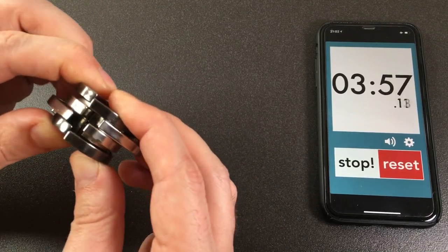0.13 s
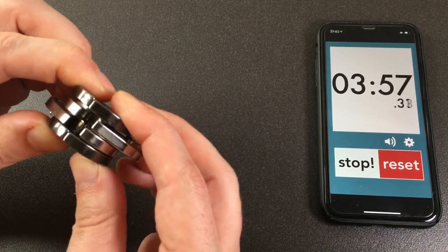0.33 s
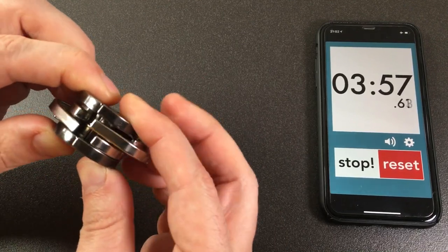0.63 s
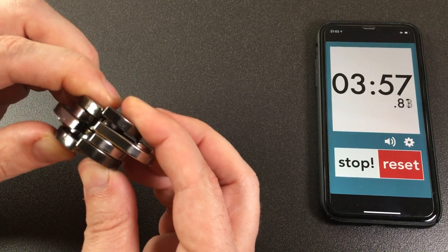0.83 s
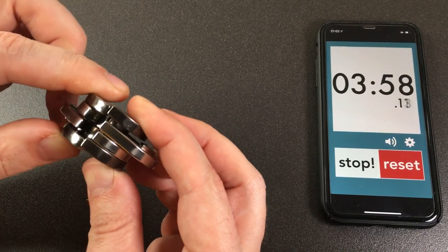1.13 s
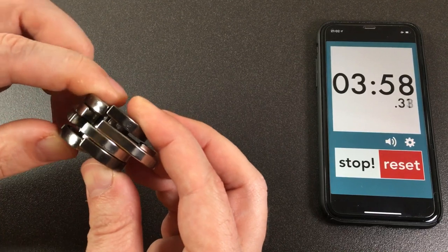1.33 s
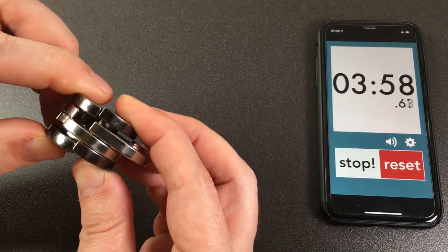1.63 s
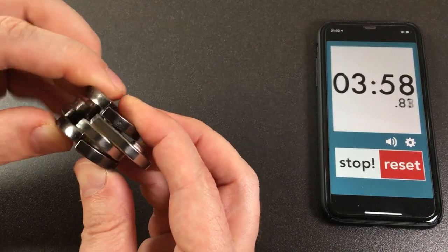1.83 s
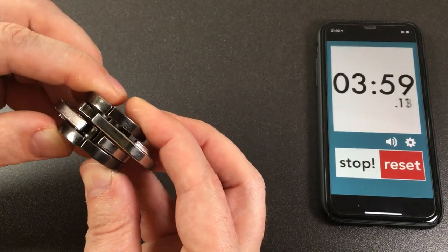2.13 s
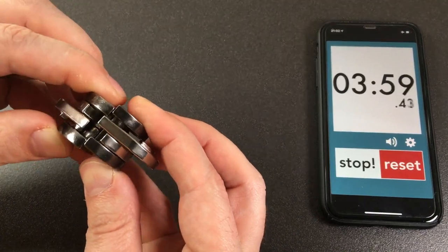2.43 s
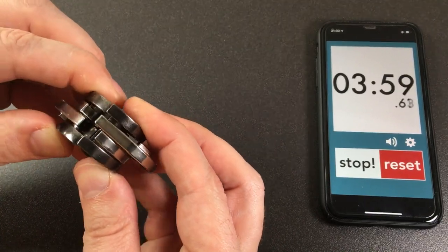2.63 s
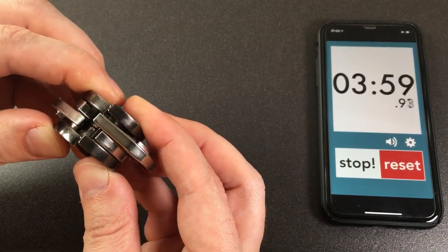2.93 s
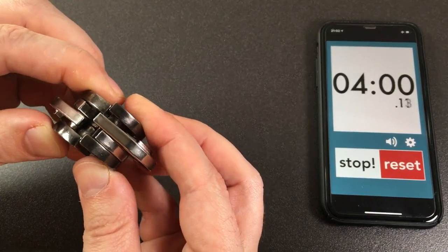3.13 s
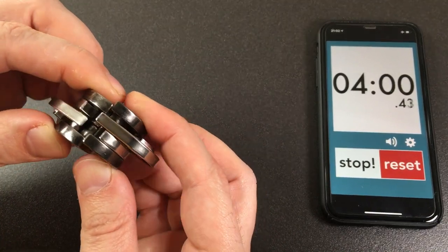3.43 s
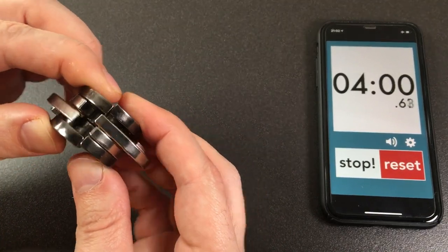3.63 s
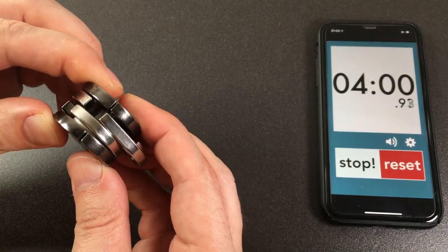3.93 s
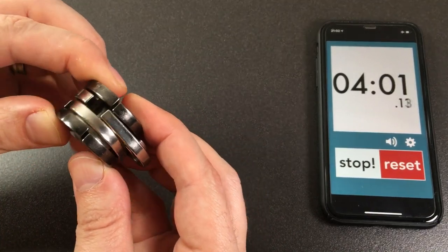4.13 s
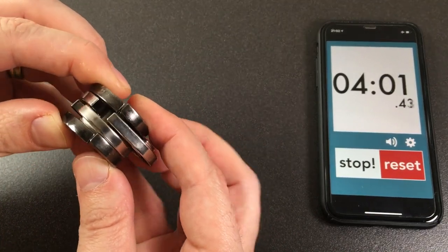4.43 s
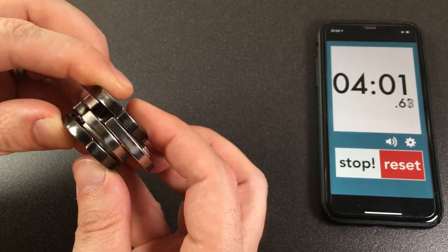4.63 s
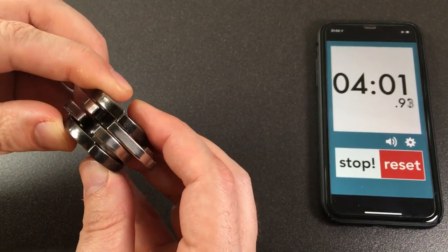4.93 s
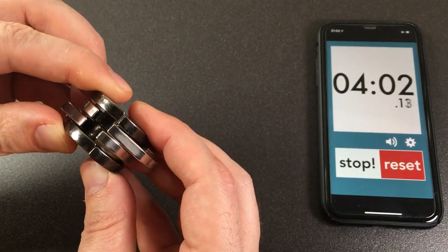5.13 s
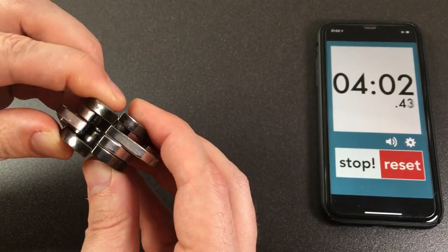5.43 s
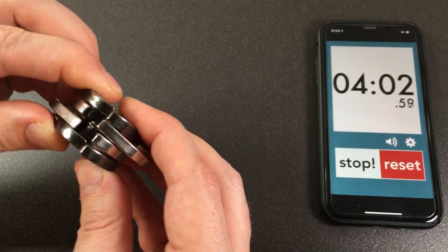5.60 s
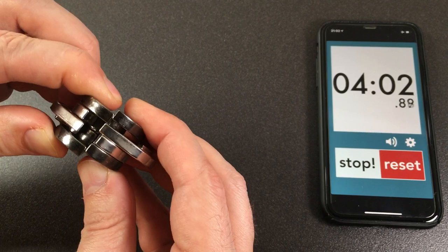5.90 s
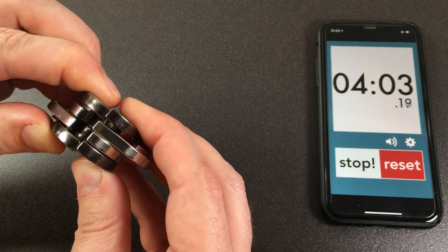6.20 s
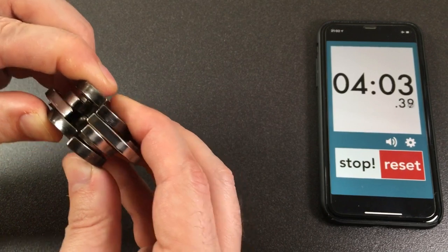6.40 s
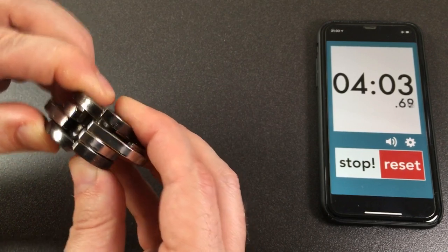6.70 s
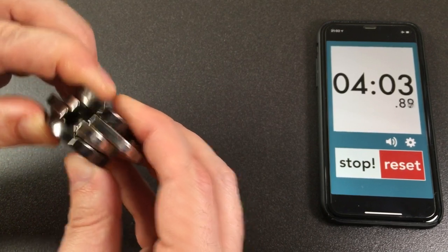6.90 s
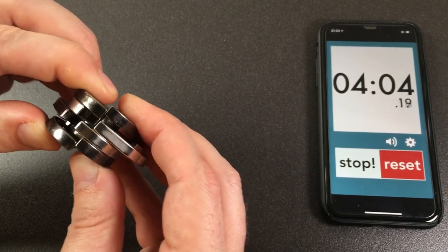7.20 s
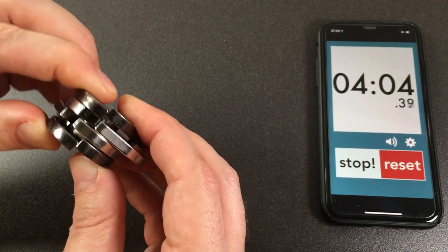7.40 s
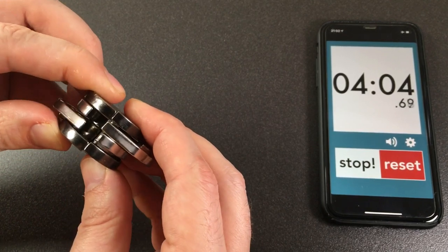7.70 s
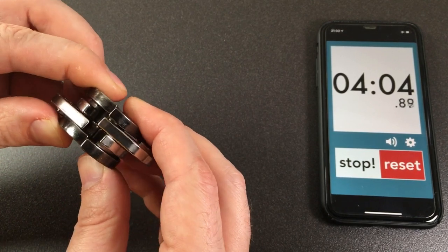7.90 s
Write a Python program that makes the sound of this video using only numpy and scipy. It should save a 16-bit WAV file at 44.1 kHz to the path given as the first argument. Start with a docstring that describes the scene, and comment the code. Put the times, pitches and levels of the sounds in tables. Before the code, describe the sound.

A close, dry take in a small quiet room: interlocked steel puzzle pieces worked in the fingers over a desk. A low desk rumble fades at once, leaving soft room tone and faint high ticks. Until about 1.5 s the clicks are sparse and light, with soft desk taps near 1.1 s. From 1.6 to 2 s a tighter, brighter cluster chatters, followed by uneven small clinks. Sharp snaps stand out around 3.7-3.85 s, then scattered clicks with strong ones near 4.2 and 4.7 s. It thins around 5 s, picks up from 5.3 s, with a hard clack at 5.8 s. Between 6.05 and 7.25 s loud knocks come every tenth of a second or so, with fine rattle, dull desk bumps and low booming. After 7.3 s it drops to small quick ticks until 8 s. Rings are short and finger-damped; sleeve friction is barely audible.

```python
"""Faint, high steel ticks open over a fading desk boom and quiet room tone; then knocks crowd in and harden.
Interlocked steel puzzle pieces are jiggled in the hands above a desk, close to a microphone. Each knock
is a chatter of random contacts ringing finger-damped modes, with a fine rattle of grazing pieces around it.
Noise through the desk modes makes soft bumps and sleeve hiss; noise in three low bands makes the boom.
A small room answers with sparse decaying echoes, and shaped steady noise is the room tone."""
import sys
import numpy as np
from scipy import signal
from scipy.fft import rfft, irfft
from scipy.io import wavfile
from scipy.ndimage import uniform_filter1d

SR = 44100
rng = np.random.default_rng(int(sys.argv[2]) if len(sys.argv) > 2 else 0)


def wav_record(signal):
    """Record a signal, one row per channel, as 16-bit PCM in the file named by sys.argv[1]."""
    frames = np.transpose(np.atleast_2d(signal))
    bounded = np.clip(frames, -1, 1)
    # unit amplitude maps onto the largest positive 16-bit level
    quanta = np.round(bounded * 32767).astype(np.int16)
    wavfile.write(sys.argv[1], SR, quanta)


N = 355049


def gain_of(db):
    """Decibels to amplitude."""
    return 10 ** (np.asarray(db) / 20)


def evened(x):
    """Scales to rms 1."""
    return x / np.sqrt(np.mean(x ** 2) + 1e-20)


def read(points, hz):
    """Reads a table on a log-frequency axis."""
    f, value = np.transpose(points)
    return np.interp(np.log(hz + 1), np.log(f + 1), value)


def follow(points):
    """Reads a table over time, one value per sample."""
    return np.interp(np.arange(N) / SR, *np.transpose(points))


def add(mix, s, sound):
    """Mixes a sound in at time s."""
    part = mix[round(s * SR):][:len(sound)]
    part += sound[:len(part)]


# steel knocks: [t/s, peak level/dB, favoured mode f/Hz, favoured mode gain/dB,
#                clack level/dB, upper ring level/dB, chatter length/s]; both levels relative to the main ring
KNOCKS = [(0.114, -53, 6200, 13, -4, -24, 0.005), (0.205, -48.5, 5000, 11, -12, -16, 0.0029),
          (0.247, -40.5, 6300, 3, -17, -18, 0.002), (0.303, -50.0, 6550, 6, -13, -24, 0.0027),
          (0.326, -39.5, 6660, 0, -20, -23, 0.0029), (0.349, -32.5, 5700, 10, -11.5, -11, 0.0021),
          (0.483, -42.5, 5700, 3, -22, -13, 0.0024), (0.608, -49, 4960, 12, -32, -24, 0.0017),
          (0.633, -53.5, 6700, 10, -14, -23, 0.003), (0.755, -31.5, 6300, 1, -25, -15.5, 0.0022),
          (0.84, -39, 4880, 9, -18, -17, 0.0017), (0.86, -33.5, 9100, 7, -19.5, -17, 0.0025),
          (0.871, -34, 9700, 0, -18, -5, 0.002), (0.997, -55.0, 11100, 7, -6, -10, 0.0026),
          (1.028, -53, 7100, 7, -16, -14, 0.0091), (1.049, -44.5, 5050, 19, -21, -18, 0.0057),
          (1.07, -49.0, 5730, 12, -14, -22, 0.003), (1.276, -32.5, 6900, 23, -21, -10.5, 0.0026),
          (1.304, -44.5, 9760, 7, -12, -4, 0.0065), (1.364, -48.5, 7610, 15, -16, -10, 0.0027),
          (1.381, -52.0, 7560, 7, -8, -15, 0.0077), (1.442, -55.0, 6960, 4, -14, -11, 0.0033),
          (1.551, -44, 2840, 10, -9, -24, 0.0026), (1.568, -48, 3450, 25, -13, -31, 0.0025),
          (1.612, -45, 6020, 10, -12, -31, 0.003), (1.627, -24.0, 9460, 13, -11.5, -13, 0.0036),
          (1.637, -23.5, 12200, 3, -30, -2, 0.0028), (1.661, -32.0, 6800, 1, -23, -21, 0.0036),
          (1.702, -33.0, 7000, 9, -24, -12, 0.0027), (1.751, -46, 6200, 7, -18, -26, 0.0028),
          (1.808, -30.5, 6700, 6, -26, -14, 0.0018), (1.818, -24.5, 6530, 9, -26, -9, 0.0016),
          (1.83, -27.5, 6700, 16, -17, -2, 0.0018), (1.867, -30.5, 8430, 2, -10, -7, 0.0057),
          (1.879, -17, 6680, 15, -18.5, -5.5, 0.0042), (1.902, -28.5, 6640, 10, -23, -19, 0.006),
          (1.918, -24, 6640, 4, -24, -13, 0.0035), (1.983, -35, 6470, 5, -19, -16, 0.0046),
          (2.005, -42.5, 6060, 9, -18, -16, 0.006), (2.033, -29.5, 9540, 18, -15, -17, 0.0043),
          (2.206, -37.5, 6160, 12, -12, -13, 0.0018), (2.232, -34.5, 6730, 6, -14, -9, 0.0033),
          (2.286, -25.0, 6120, 24, -13.5, -6.5, 0.0039), (2.328, -40.5, 8660, 13, -4, -9, 0.0035),
          (2.337, -33.5, 6570, 14, -21, -5, 0.003), (2.367, -43, 8700, 13, -29, -10, 0.0024),
          (2.385, -41.0, 6500, 7, -17, -11, 0.0044), (2.408, -41, 6200, 10, -14, -11, 0.0041),
          (2.493, -45, 4010, 16, -1, -17, 0.0017), (2.5305, -28, 7610, 32, -11, -8, 0.0019),
          (2.576, -46, 7240, 9, -8, -20, 0.0057), (2.632, -28.5, 9380, 11, -34, -7, 0.0018),
          (2.648, -41, 6100, 7, -8, -7, 0.0018), (2.669, -38, 2820, 18, -14, -7, 0.0018),
          (2.69, -30, 8660, 13, -14, -18, 0.002), (2.716, -41.0, 4340, 9, -6, -31, 0.0023),
          (2.726, -21.5, 5900, 3, -23, -15, 0.0024), (2.73, -24, 5920, 14, -19, -10, 0.004),
          (2.849, -29, 6640, 1, -15, -3, 0.0024), (2.866, -33.5, 6050, 3, -33, -10, 0.0024),
          (2.936, -43, 7160, 7, -12, -25, 0.003), (2.945, -29, 6300, 7, -35, -21, 0.0023),
          (2.95, -27, 11260, 7, -19, -6, 0.0026), (3.02, -47, 9540, 17, -16, -11, 0.0085),
          (3.057, -41.5, 4840, 14, -19, -34, 0.0028), (3.08, -46.0, 4850, 10, -15, -15, 0.0026),
          (3.199, -34.5, 5860, 11, -15, -16, 0.0025), (3.267, -45.5, 6700, 7, -19, -39, 0.0025),
          (3.3224, -35, 4800, 4, -12, -6, 0.0029), (3.378, -44.5, 6040, 2, -8, -17, 0.0042),
          (3.418, -34.0, 6880, 20, -20, -9, 0.0025), (3.4815, -46.0, 8700, 10, -13, -13, 0.0021),
          (3.572, -34.5, 6550, 6, -29, -14, 0.0093), (3.602, -33, 8200, 16, -21, -15, 0.0019),
          (3.688, -50, 9150, 7, -22, -18, 0.004), (3.708, -46.5, 10800, 1, -8, -4, 0.0027),
          (3.717, -17, 13050, 6, -32, -41, 0.0058), (3.721, -18, 4770, 5, -37, -12, 0.0048),
          (3.725, -15.0, 12280, 16, -15, 5, 0.0048), (3.792, -21.5, 8500, 16, -37, -12, 0.002),
          (3.833, -30.5, 2820, 7.5, -9, -13, 0.0081), (3.8437, -9.5, 12120, 1.5, -23.5, -9, 0.0044),
          (3.934, -37.5, 8440, 2, -9, 0, 0.003), (3.971, -20.5, 6630, 10.5, -17.5, -20, 0.0017),
          (3.981, -28, 9000, 5, -25, -2, 0.0033), (4.05, -25.5, 6070, 9, -4.5, 0.5, 0.0019),
          (4.079, -44, 3540, 5, -1, -16, 0.003), (4.12, -55.0, 6640, 7, -2, -17, 0.003),
          (4.162, -41.0, 2800, -3, -3, -21, 0.0016), (4.207, -31.5, 4240, 24, -19, -11, 0.0045),
          (4.225, -17.5, 6730, 14, -19.5, -15, 0.0015), (4.244, -23.0, 6800, 8, -17, -10, 0.0044),
          (4.329, -42.5, 6900, 19, -15, -16, 0.0019), (4.363, -44, 8300, 11, -38, -14, 0.0019),
          (4.446, -51.5, 6650, -11, -21, -21, 0.003), (4.5254, -31, 8240, 3.5, -26, -2, 0.0047),
          (4.539, -33, 6540, 9, -18, -33, 0.0024), (4.55, -39.5, 8450, 10, -21, -10, 0.003),
          (4.588, -42, 6560, 7, -23, -22, 0.0017), (4.603, -34, 6630, 2, -12, -24, 0.00083),
          (4.686, -37.5, 6560, 14, -5, -12, 0.0049), (4.717, -16.5, 5800, 3, -31, -15.5, 0.0043),
          (4.7208, -16.5, 6120, 17, -14.5, -11, 0.002), (4.879, -42.5, 6480, 5, -12, -11, 0.0031),
          (4.893, -52.5, 4030, 12, -4, -45, 0.0026), (4.937, -52.0, 7000, 12, -14.5, -18, 0.0026),
          (5.115, -49.5, 8500, 8, -10.5, -7.5, 0.0025), (5.2658, -39.5, 3480, 9, -12, -15, 0.0012),
          (5.315, -55.0, 3500, 9, -10, -27, 0.0026), (5.3308, -29.5, 6820, 14, -18, -11, 0.0047),
          (5.3604, -23.5, 6800, 4, -26, -15.5, 0.0013), (5.376, -38, 9030, 7, -11, -8, 0.0047),
          (5.404, -38.5, 7130, 13, -4, -16, 0.0022), (5.573, -31.5, 6090, 5.5, -7, -11.5, 0.0026),
          (5.586, -30.5, 9300, 8, -13, -12, 0.0051), (5.611, -21.0, 6550, 14, -18, -9, 0.0017),
          (5.644, -30.5, 7000, 9, -13, -19, 0.0039), (5.692, -39, 5490, 7, -20, -21, 0.0018),
          (5.703, -29.5, 7620, 29, -14, -9, 0.0023), (5.76, -47.5, 4850, 11, -14, -35, 0.0023),
          (5.793, -36.5, 8600, -3, -14, -12, 0.021), (5.8154, -12.5, 6700, 0, -23.5, -14.5, 0.0042),
          (5.984, -48.5, 6120, 7, -34, -29, 0.0038), (6.005, -41, 5210, 19, -25, -37, 0.0035),
          (6.022, -42, 3470, 18, -17, -20, 0.0082), (6.055, -36, 6990, 12, -12, -13, 0.0035),
          (6.068, -25, 8520, 8, -24, -5, 0.0098), (6.0786, -9.5, 6200, -7, -20.5, -17, 0.0027),
          (6.161, -38, 6660, 7, -15, -9, 0.0027), (6.174, -33.5, 7100, 10, -19, -13, 0.0019),
          (6.183, -33.5, 8240, 20, -10, -18, 0.0091), (6.202, -16.0, 6400, 9, -21, -13.5, 0.0049),
          (6.223, -24.5, 8790, 13, -15, -8, 0.0026), (6.336, -27, 5800, 11, -10, -11, 0.003),
          (6.353, -23, 6550, 8, -15.5, -8, 0.0053), (6.3706, -9.0, 7060, 18, -19, -9.5, 0.0044),
          (6.379, -24, 8500, 9, -16, -7, 0.0033), (6.479, -25, 12200, 6, -15, -16, 0.0095),
          (6.4948, -13, 6500, 6, -31, -17, 0.0021), (6.4984, -6, 6400, 3, -21.5, -9, 0.0032),
          (6.608, -27.5, 8700, -2, -18, -8, 0.0049), (6.618, -23, 12700, 11, -21, -7, 0.0034),
          (6.63, -10, 5860, 7, -13.5, -7, 0.0044), (6.639, -6, 10680, 3, -30, -9, 0.0028),
          (6.713, -21.5, 12200, 1, -13.5, -11, 0.0055), (6.729, -6, 10870, 6, -20.5, -14, 0.0025),
          (6.827, -24.5, 6460, 2, -18, -12, 0.02), (6.849, -16.0, 6900, 13, -31, -15, 0.0062),
          (6.861, -9.5, 7770, 21.5, -20.5, -8.5, 0.0023), (6.93, -26, 5650, 9, -8.5, -4, 0.0084),
          (6.945, -8, 9760, 15, -23, -13, 0.0034), (7.035, -25.5, 10160, 12, -6, -1, 0.0041),
          (7.044, -18.5, 12600, 9, -22, -7, 0.005), (7.064, -23, 6480, 12, -17.5, -8, 0.0053),
          (7.108, -20, 6120, 14, -13.5, -8, 0.035), (7.135, -9, 8220, 16, -32, -12, 0.0058),
          (7.2303, -8.5, 8180, 12, -21, -11.5, 0.0024), (7.311, -29, 6170, 11, -20, -19, 0.0029),
          (7.347, -47.0, 6300, 6.5, -28, -29, 0.0035), (7.397, -54.5, 4120, 17, -12, -27.5, 0.0028),
          (7.466, -41.5, 5800, 5, -24, -20, 0.0023), (7.498, -46.0, 7250, 11, -11, -1, 0.0027),
          (7.53, -37, 2740, 14, -12, -8, 0.003), (7.535, -27, 12350, -1, -15.5, -10, 0.0052),
          (7.62, -36.5, 6770, 12, -6, 4, 0.0019), (7.663, -49, 2630, 8, 15, 2, 0.014),
          (7.6946, -27.0, 4390, 19.5, -25, -15, 0.0016), (7.747, -38.5, 8240, 14, -15, -14, 0.0024),
          (7.756, -40, 6660, -2, -15, -14, 0.0034), (7.81, -49, 7740, 4, -14, -10, 0.003),
          (7.823, -43.0, 6620, 7, -10, -13, 0.0027), (7.854, -38.5, 6430, 10, -11, -16, 0.0081),
          (7.8965, -40, 6040, 1, -11, -14, 0.0031), (7.911, -34, 6550, 3, -22, -10, 0.003),
          (7.925, -27.5, 6470, 8, -12.5, -7, 0.0024), (7.943, -36, 6350, 8, -20, -12, 0.0027),
          (7.986, -45.5, 5970, 8, -12, 0, 0.0015)]
# clack, main, upper and top ring of a usual knock: [f/Hz, level/dB]
USUAL_BANDS = [(2500, -21.5), (5800, 4.5), (9200, -9.5), (13300, -11)]
TOP_DB, TOP_SLOPE = -8.5, 0.38  # top ring: dB at a full-scale knock, dB per dB of force
SHARP, SHARP_SLOPE = 0.54, -0.0087  # share of the first contact at full scale, change per dB of force
SCRAPE_S = 0.02  # a chatter this long halves the share of the first contact
GRIP = 2.13  # damping factor of the fingers


def knock(db, favoured_hz, favour_db, clack_db, upper_db, chatter_s):
    """A first contact, then random rebounds; hard knocks put more weight on a swelling chatter."""
    band_hz, usual_db = np.transpose(USUAL_BANDS)
    wanted_db = np.array([clack_db, 0, upper_db, TOP_DB + TOP_SLOPE * db])
    colour = list(zip(band_hz, wanted_db - usual_db))

    u = np.arange(2048) / SR / max(chatter_s, 0.0005)
    sharp = np.clip((SHARP + SHARP_SLOPE * db) / (1 + chatter_s / SCRAPE_S), 0, 1)
    fade = sharp * np.exp(-u) + (1 - sharp) * u * np.exp(1 - u)

    draw = rng.random((6, 2048))
    rebounds = draw[:3] < 700 / SR  # about 700 per second for each of three contacts
    sizes = 0.68 * np.cos(np.pi * draw[3:])  # random strength and sign
    trains = rebounds * fade * sizes
    trains[0, 0] = sharp

    contacts = strikes(favoured_hz, favour_db, colour, GRIP, count=3)
    out = radiated(signal.fftconvolve(trains, contacts, axes=1).sum(0))
    return gain_of(db) * out / abs(out).max()


# ringing modes of the pieces, before finger damping: [f/Hz, level/dB, t60/s]
PIECES = [(2115, -36.0, 0.071), (2500, -27, 0.36), (2783, -15, 0.028), (3545, -12.5, 0.026),
          (4086, -16.5, 0.11), (4847, -12.5, 0.065), (5307, -10.0, 0.049), (5806, 0, 0.016),
          (6010, -6.5, 0.063), (6625, 1, 0.024), (6920, -3.0, 0.011), (8673, -10, 0.068),
          (9800, -10.5, 0.029), (10310, -7.5, 0.055), (9166, -4, 0.022), (10850, -11.5, 0.062),
          (12030, -6, 0.052), (11120, -14.5, 0.079), (12110, -5.0, 0.044), (12760, -2, 0.039),
          (14220, 1.0, 0.018), (13800, -21, 0.05), (14830, -15.5, 0.059), (14040, -18.5, 0.05),
          (16600, -23, 0.089), (4316, -13.5, 0.019), (7690, -15.5, 0.014), (8210, -12.5, 0.046),
          (10100, -13.0, 0.0077)]
# colour of the bare contact: [f/Hz, level/dB]
TICK = [(300, -34.5), (900, -28), (2000, -17), (4000, -3.5), (6500, 7), (10000, -1), (14000, -7.5),
        (16500, -27.5)]


def strikes(favoured_hz, favour_db, colour, grip, count):
    """Several single contacts, each a noise tick plus the damped modes of a slightly different piece."""
    hz, mode_db, t60 = (c[:, None] for c in np.transpose(PIECES))
    luck = rng.standard_normal((3, count, len(PIECES), 1))
    f = np.fft.rfftfreq(4096, 1 / SR)
    # the way the pieces hang leaves the modes near one frequency free: louder, longer and truer
    free = np.exp(-(np.log(hz / favoured_hz) / 0.037) ** 2)
    size_db = mode_db + read(colour, hz) + favour_db * free + 2.16 * luck[0]
    size = gain_of(size_db) * np.sign(luck[1])

    # like pieces are never tuned quite alike
    pulled_hz = hz + 0.65 * free * (favoured_hz - hz)
    own_hz = pulled_hz * (1 + 0.011 * (1 - 0.64 * free) * luck[2])

    # fingers shorten the ring; soft skin soaks up the slow bending modes most
    loss_hz = np.log(1000) * grip * (1 - 0.5 * free) / t60 / (2 * np.pi)
    loss_hz = loss_hz + 50 * (2500 / hz) ** 3
    rings = irfft((size / (loss_hz + 1j * (f - own_hz))).sum(1))

    # the bare contact: a few milliseconds of coloured noise
    burst = rng.standard_normal((count, 512)) * np.exp(-np.arange(512) / SR / 0.0012)
    tick_gain = gain_of(read(TICK, f) + read(colour, f))
    ticks = irfft(rfft(np.roll(burst, 8, axis=1), 4096) * tick_gain)
    both = rings / abs(rings).max() + gain_of(-1.5) * ticks / abs(ticks).max()
    return both[:, :3072]


def radiated(x):
    """Pieces this small radiate little bass: a gentle high-pass at 1200 Hz."""
    return signal.sosfilt(signal.butter(2, 1200, "high", fs=SR, output="sos"), x)


IDLE_DB = -88  # loose pieces graze all the time
SETTLE_DB, SETTLE_S = -45, 0.028  # swell relative to the knock's peak, seconds to its height


def rattle():
    """A random hail of tiny contacts of uneven size, swelling after each knock as the pieces settle."""
    level = np.full(N, gain_of(IDLE_DB))
    u = np.arange(SR // 2) / SR / SETTLE_S
    for s, db, *_ in KNOCKS:
        add(level, s, gain_of(db + SETTLE_DB) * u * np.exp(1 - u))

    draw = rng.random((12, N))
    sizes = gain_of(-2.5 * np.log(draw[6:] + 0.00096))  # mostly small, a few much larger
    trains = (draw[:6] < 250 / SR) * sizes  # about 250 per second of each kind
    kinds = strikes(6440, 5, [(2500, 2.5), (6000, 0.0), (14000, -6.5)], 3.5, count=6)
    hail = signal.oaconvolve(trains, kinds, axes=1).sum(0)[:N]
    return level * evened(radiated(hail))


# soft bumps on the desk: [t/s, peak level/dB, favoured mode f/Hz, puff level/dB relative to the ring]
BUMPS = [(1.033, -59, 456, -6), (1.13, -47.5, 937, 0), (1.149, -49.5, 1010, -15), (1.173, -57.5, 466, -10),
         (2.491, -61, 890, -10), (3.563, -48, 424, -14), (3.792, -53.5, 1410, -5), (3.968, -54, 1450, -9),
         (4.715, -51, 1520, -4.5), (5.218, -65, 401, -3), (5.966, -52.5, 1390, 1), (6.2, -51, 380, -10),
         (6.373, -45, 490, 0.5), (6.502, -38.5, 925, 1), (6.626, -44.5, 464, -2), (6.729, -39.5, 926, -11),
         (6.856, -46, 920, -2.5), (6.944, -43.5, 939, -17), (7.031, -48, 1430, -12), (7.133, -40, 1440, -5),
         (7.509, -51, 1420, -1), (7.754, -64, 900, -7)]
BUMP_S = 0.0055  # decay of the blow, seconds


def bump(db, favoured_hz, puff_db):
    """A soft blow spread over some milliseconds: a dull puff and the ring of the desk."""
    u = np.arange(4000) / SR / BUMP_S
    drive = rng.standard_normal(4000) * np.sqrt(u) * np.exp(-u)
    ring = desk_ring(favoured_hz, 14.4, drive)[:4000]
    puff = signal.sosfilt(signal.butter(4, [350, 2700], "band", fs=SR, output="sos"), drive)
    out = evened(ring) + gain_of(puff_db) * evened(puff)
    return gain_of(db) * out / abs(out).max()


# low modes of the desk top: [f/Hz, level/dB, t60/s]
DESK_TOP = [(247, -21, 0.031), (393, -18, 0.061), (475.6, -1.5, 0.05), (624, -7, 0.028), (910, 5.5, 0.02),
            (1433, -2.5, 0.04), (1990, -1.5, 0.09)]


def desk_ring(favoured_hz, favour_db, drive):
    """Decaying sine modes of the desk top, driven by a force; modes near one frequency are favoured."""
    hz, mode_db, t60 = (c[:, None] for c in np.transpose(DESK_TOP))
    t = np.arange(4000) / SR
    spot_db = favour_db * np.exp(-(np.log(hz / favoured_hz) / 0.11) ** 2)
    modes = gain_of(mode_db + spot_db - 60 * t / t60) * np.sin(2 * np.pi * hz * t)
    return signal.oaconvolve(drive, modes.sum(0))


# sleeves dragging over the desk: [t/s, level/dB]
RUB = [(0.0, -88), (0.69, -72), (1.14, -81), (1.61, -84), (1.97, -71.5), (2.49, -89), (2.87, -78),
       (3.1, -90), (3.7, -71.5), (4.39, -75), (5.039, -90), (5.27, -77.5), (5.87, -83), (6.08, -69.5),
       (6.43, -75.5), (6.9, -73), (7.26, -91), (8.05, -88)]


def rub():
    """Cloth friction, a smoothed noise force, hisses faintly in the desk modes."""
    friction = uniform_filter1d(rng.standard_normal(N), size=18)
    return gain_of(follow(RUB)) * evened(desk_ring(1400, 5, friction)[:N])


def room(x):
    """Two random echo tails, faded in and out in turn by a steady rotation, so the echoes vary."""
    turn = 2 * np.pi * 3.1 * np.arange(N) / SR  # 3.1 turns per second
    shares = (np.cos(turn), np.sin(turn))
    return sum(signal.oaconvolve(x * share, room_tail())[:N] for share in shares)


# reverberation time of the room: [f/Hz, t60/s]
ROOM_T60 = [(500, 0.29), (2000, 0.24), (6000, 0.16), (12000, 0.19), (16000, 0.18)]


def room_tail():
    """Sparse taps of random sign, one in every 20 samples, each band dying at its own speed."""
    taps = np.zeros(SR // 2)
    at = np.arange(160, len(taps) - 20, 20)
    taps[at + rng.integers(0, 20, len(at))] = rng.choice([-1., 1.], len(at))
    hz, t, z = signal.stft(taps, SR, nperseg=128)
    decay = gain_of(-60 * t / read(ROOM_T60, hz)[:, None])
    tail = signal.istft(z * decay, SR, nperseg=128)[1]
    return tail / np.linalg.norm(tail)


# lowest desk resonances: [f/Hz, width/Hz, level/dB relative to REST_DB, rise in dB per dB of shaking]
DESK_BOOM = [(29.5, 28.3, -3, 0.95), (81.7, 10.7, -9, 1.17), (125.4, 16, -8.5, 0.94)]
# forearms shaking the desk: [t/s, level/dB]
ARMS = [(0.0, -52), (0.04, -60), (0.13, -66.5), (0.33, -66.5), (2.55, -63.5), (2.82, -58.5), (3.18, -68),
        (3.68, -61), (5.99, -58), (6.17, -55), (6.32, -60), (6.43, -46.5), (6.48, -52.5), (6.55, -48.5),
        (6.64, -58), (6.77, -47), (6.84, -53.5), (7.02, -48), (7.11, -59), (7.26, -54.5), (7.31, -61),
        (8.05, -61)]
REST_DB = -60  # shaking at which the resonances keep their listed balance


def desk_boom():
    """Noise in the lowest desk resonances, each rising with the shaking arms at its own rate."""
    f = np.fft.rfftfreq(N, 1 / SR)
    z = rfft(rng.standard_normal(N))
    over_db = follow(ARMS) - REST_DB
    boom = np.zeros(N)
    for hz, width, db, rise in DESK_BOOM:
        band = irfft(z / (1 + (2 * (f - hz) / width) ** 2), N)
        boom += gain_of(REST_DB + db + rise * over_db) * evened(band)
    return boom


# spectrum of the room tone: [f/Hz, relative level/dB per Hz]
TONE = [(12, -21), (20, -2.5), (135, -11), (273, -16.5), (616, -25), (709, -26.5), (966, -29),
        (1320, -29.5), (2580, -35), (2810, -35), (3940, -35), (8650, -40.5), (9950, -38.5), (15200, -43),
        (16500, -50)]
TONE_DB = -69  # rms level of the part above 150 Hz


def room_tone():
    """Steady coloured noise, levelled by its part above the boom."""
    f = np.fft.rfftfreq(N, 1 / SR)
    z = rfft(rng.standard_normal(N)) * gain_of(read(TONE, f))
    return gain_of(TONE_DB) * irfft(z, N) / irfft(z * (f > 150), N).std()


def scene():
    """Puzzle and desk, their echo, boom and room tone."""
    puzzle, desk = rattle(), rub()
    for s, *row in KNOCKS:
        add(puzzle, s, knock(*row))
    for s, *row in BUMPS:
        add(desk, s, bump(*row))
    # the push of each knock travels down the arms into the desk
    pushed = gain_of(-60.5) * desk_ring(340, 4.7, abs(puzzle))[:N]
    near = puzzle + desk + pushed
    return (near + gain_of(-12) * room(near) + desk_boom() + room_tone())[None]


def record(dry):
    """The band limit: a steep low-pass at 16 kHz."""
    lowpass = signal.firwin(255, 16000, window=("kaiser", 9), fs=SR)
    return signal.oaconvolve(dry, lowpass[None], "same")


dry = scene()
out = record(dry)
wav_record(out)
```